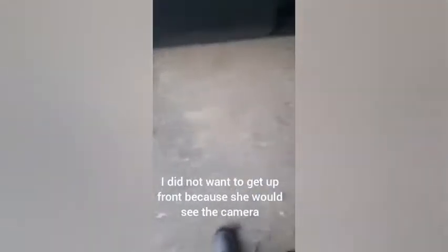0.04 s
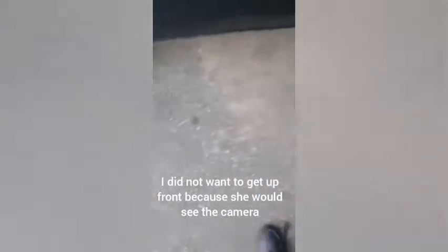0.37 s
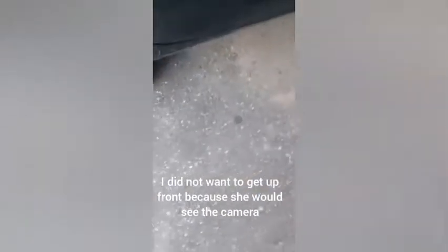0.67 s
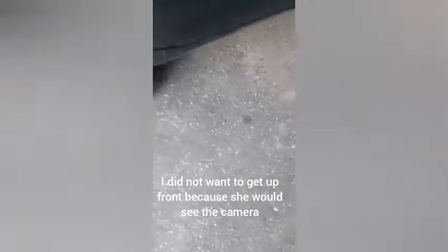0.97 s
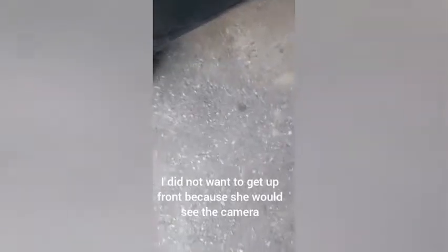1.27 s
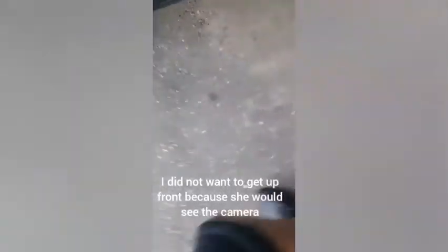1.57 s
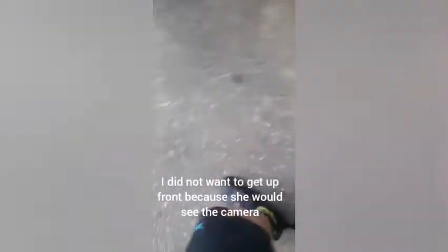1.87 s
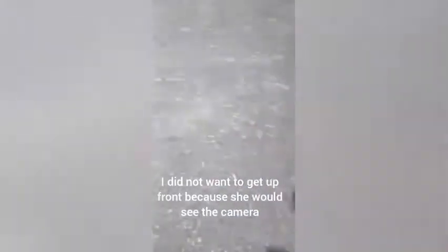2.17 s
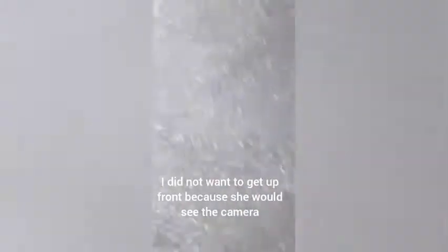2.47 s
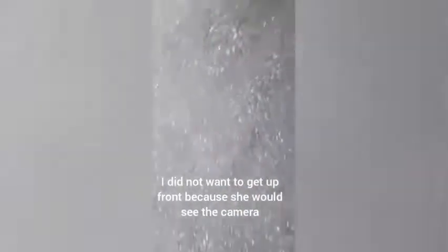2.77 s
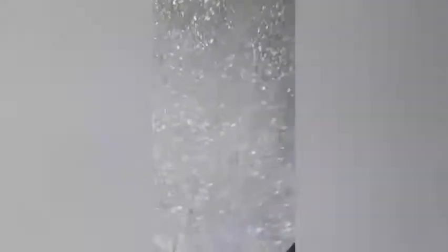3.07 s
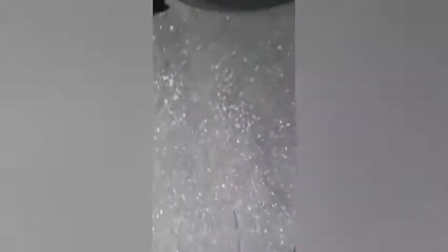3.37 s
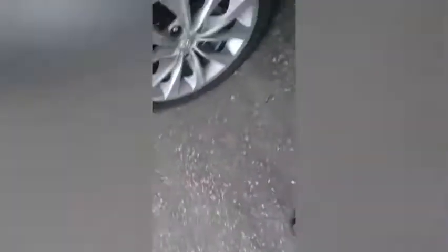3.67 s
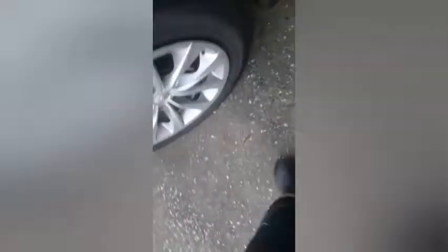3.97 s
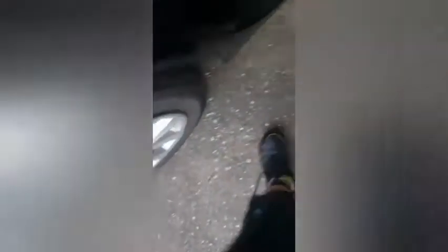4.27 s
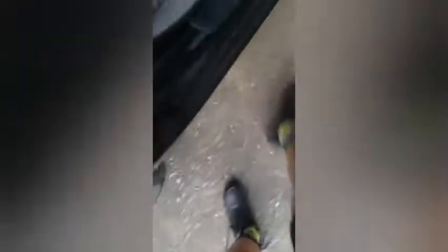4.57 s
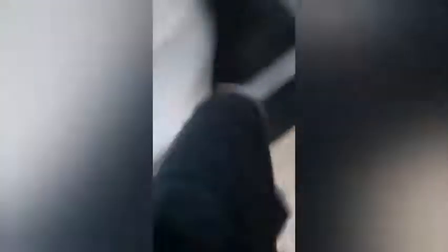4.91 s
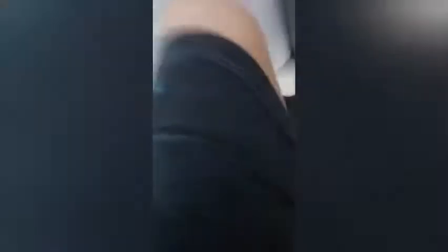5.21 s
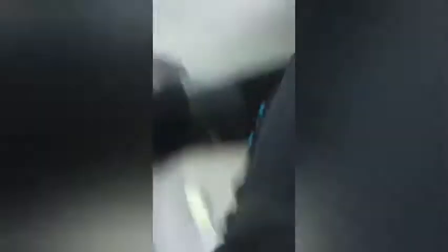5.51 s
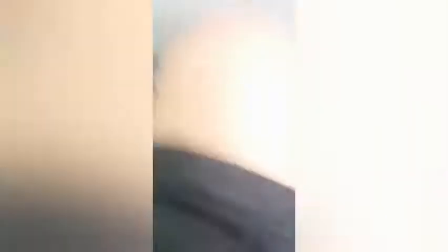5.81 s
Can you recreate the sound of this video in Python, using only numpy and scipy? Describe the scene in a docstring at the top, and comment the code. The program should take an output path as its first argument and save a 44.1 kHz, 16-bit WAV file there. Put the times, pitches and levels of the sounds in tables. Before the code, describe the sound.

A faint, low traffic rumble runs throughout this outdoor scene, heard from a handheld phone. From the start, close shoes scuff and crunch on gritty pavement while trousers rustle softly. A finger slides over the microphone on the right, rubbing and hissing briefly at 0.2 seconds and again from 1.5 to 2. At 2.2 and 2.8 seconds two car doors whoosh shut, with clicking latches, loud panel thuds and an echo from nearby walls. Scratchy finger rubs and snags return from 3 to 3.6 seconds, around a firm footfall at 3.2. A rubber sole gives a short, quiet squeak and scrape just after 4 seconds. Sharp handling ticks and rubs hit the microphone at about 4.3, 4.8 and 5.2 seconds. Clothes swish as the walker climbs in, and feet knock hard against the car's sill at 5.4 and 5.7 seconds, followed by a few softer bumps.

```python
"""Far traffic rumbles as someone holding a phone walks to a parked car, shoes scuffing and crunching
on gritty pavement. From the first steps on, a finger keeps sliding over the right microphone port,
rubbing and hissing. At 2.2 s and 2.8 s two other doors of the car whoosh shut: latches click, panels
thud and nearby walls echo. A rubber sole squeaks just after 4 s, and near the end feet knock hard
against the sill (the ledge under the door) as the walker climbs in."""
import sys
import numpy as np
from scipy import signal
from scipy.fft import rfft, irfft
from scipy.io import wavfile

SR = 44100
rng = np.random.default_rng(int(sys.argv[2]) if len(sys.argv) > 2 else 0)


def store_pcm(level_fs):
    """Save levels as 16-bit WAV."""
    pcm = np.round(np.clip(level_fs, -1, 1) * 32767).astype(np.int16)
    wavfile.write(sys.argv[1], SR, np.atleast_2d(pcm).T)


N = 266805
TIME = np.arange(N) / SR


def amp(db):
    """Turns decibels into a number to multiply a sound by."""
    return 10 ** (np.asarray(db) / 20)


def unit(x):
    """Scales a signal to an average (rms) size of 1."""
    return x / np.sqrt(np.mean(x ** 2) + 1e-20)


def at_pitch(points, hz):
    """Looks up a table at any pitch, blending between its rows."""
    pitches, values = np.transpose(points)
    return np.interp(np.log(hz + 1), np.log(pitches + 1), values)


def curves(rows):
    """Turns each column of a time table into a value for every sample."""
    times, *columns = np.transpose(rows)
    return [np.interp(TIME, times, column) for column in columns]


def add(mix, start_s, sound):
    """Mixes a sound in at the given time."""
    part = mix[..., round(start_s * SR):][..., :sound.shape[-1]]
    part += sound[..., :part.shape[-1]]


def through(x, response):
    """Passes each channel through a filter or an echo."""
    return signal.fftconvolve(np.atleast_2d(x), np.atleast_2d(response), axes=1)[:, :N]


def colour(x, tone, size=4096):
    """Makes some pitches stronger and others weaker, following a tone table."""
    log_gain = np.log(amp(at_pitch(tone, abs(np.fft.fftfreq(size, 1 / SR)))))
    spectrum = np.exp(np.conj(signal.hilbert(log_gain)))  # rings after a hit, never before
    taps = np.fft.ifft(spectrum).real[:size // 2]
    return through(x, taps / np.linalg.norm(taps))


def wander(hz):
    """A smooth random wobble, up to about hz times a second."""
    spectrum = rfft(rng.standard_normal(N))
    return unit(irfft(spectrum / (1 + (np.fft.rfftfreq(N, 1 / SR) / hz) ** 4), N))


def dying(fade_s):
    """Half a second of a fade that drops 60 dB every fade_s."""
    return 1000 ** (-TIME[:SR // 2] / max(fade_s, 1e-4))


# How alike left and right sound, from 0 to 1: pitch_hz, likeness
LIKENESS = [(50, 0.88), (300, 0.92), (600, 0.59), (1200, 0), (2500, 0.016), (5000, 0.096), (16000, 0.18)]
def two_ports(pair):
    """The phone's two microphone holes (ports) are close, so they share bass but not treble."""
    size = pair.shape[1]
    a, b = rfft(pair)
    alike = np.clip(at_pitch(LIKENESS, np.fft.rfftfreq(size, 1 / SR)), 0, 1)
    mid, side = a * np.sqrt((1 + alike) / 2), b * np.sqrt((1 - alike) / 2)
    return irfft(np.array([mid + side, mid - side]), size)


# Tone of far traffic: pitch_hz, gain_db
TRAFFIC_TONE = [(12, -43), (20, -23), (65, 0), (123, -0.5), (172, -5), (198, -12.5), (234, -5.5),
                (277, -14.5), (319, -13.5), (459, -13), (738, -15.5), (1710, -31), (4060, -66.5),
                (6180, -51), (16000, -43.5)]
# Its loudness as the car screens it off: time_s, level_db
TRAFFIC_LEVEL = [(0, -58.5), (2, -59), (3.6, -62), (4.5, -63.5), (5, -63.5), (6.05, -55.5)]
def traffic(hum_hz=120.8, hum_db=-72):
    """Far traffic makes a low rumble with a wavering hum in it."""
    rumble = unit(colour(two_ports(rng.standard_normal((2, N))), TRAFFIC_TONE))
    hum = np.sin(2 * np.pi * np.cumsum(hum_hz + 12 * wander(26.7)) / SR)
    hum *= amp(hum_db + 1.3 * wander(5.7))
    return rumble * amp(curves(TRAFFIC_LEVEL)[0] + 2.1 * wander(5.9)) + hum


def friction(per_s, spread_db, smooth, clump_db):
    """Rubbing makes tiny slips of uneven size, coming in clumps over a smooth hiss."""
    sizes = amp(spread_db * np.minimum(rng.exponential(1, N), 4)) * rng.choice([-1, 1], N)
    slips = unit(sizes * (rng.random(N) < per_s / SR))
    return unit((slips + smooth * rng.standard_normal(N)) * amp(clump_db * wander(66.3)))


def slide(peak_s, rise_s, hold_s, fall_s, range_db=33.5):
    """Loudness of one slide: it climbs range_db in rise_s, holds, and sinks as far in fall_s."""
    before = np.maximum(peak_s - TIME, 0) / max(rise_s, 1e-3)
    after = np.maximum(TIME - peak_s - hold_s, 0) / max(fall_s, 1e-3)
    return amp(-range_db * np.minimum(before + after, 10))


# Trousers rustling with the pace of the walk: time_s, level_db
RUSTLE_LEVEL = [(0, -75.5), (.9, -85), (1.4, -73.5), (2.3, -74), (3.4, -80), (4.5, -83), (5.3, -69),
                (6.05, -82)]
# Shoes dragging, clothes swishing, and a whoosh just before each door shuts:
# peak_s, rise_s, hold_s, fall_s, scrape_db, swish_db
SCUFFS_AND_WHOOSHES = [(.005, 0.048, 0.0037, 0.067, -56.5, -69), (0.225, 0.12, 0.009, 0.16, -54, -69),
                       (0.36, .1, 0.068, 0.092, -68.5, -79), (0.487, .05, .04, .08, -83, -72),
                       (0.606, .035, 0.017, 0.12, -53, -66), (2.182, 0.035, .01, .03, -52.5, -66),
                       (2.54, .035, 0.039, 0.19, -50, -62.5), (2.776, 0.023, 0.069, .08, -52.5, -56),
                       (2.955, 0.048, .01, 0.26, -54, -60.5), (3.057, .1, 0.058, 0.11, -59, -72),
                       (3.172, 0.022, .03, 0.17, -55, -64.5), (3.764, 0.058, 0.1, 0.26, -61.5, -65.5),
                       (4.058, 0.033, 0.019, 0.037, -71, -88.5), (4.098, .025, 0.021, 0.049, -53, -59),
                       (4.138, 0.055, 0.032, 0.086, -45.5, -59), (4.36, 0.17, .01, 0.12, -72, -71),
                       (4.628, 0.12, 0.016, 0.32, -53.5, -63), (4.917, 0.021, .005, 0.033, -103, -59),
                       (4.944, 0.014, 0.028, 0.035, -57.5, -62.5), (5.008, .015, .003, .04, -80, -70),
                       (5.043, 0.021, 0.041, .13, -59.5, -50), (5.411, 0.082, 0.038, 0.056, -40.5, -47),
                       (5.507, 0.043, 0.0073, 0.05, -59, -59.5), (5.588, 0.1, 0.017, .2, -67, -65),
                       (5.724, 0.094, .19, 0.33, -56.5, -64.5)]
# Tone of the scraping: pitch_hz, gain_db
SCRAPE_TONE = [(60, -11.5), (200, 1.5), (450, 3), (900, 0.5), (1800, -1.5), (3000, -6.5), (5000, -22),
               (16000, -60)]
# Tone of the swishing: pitch_hz, gain_db
SWISH_TONE = [(1000, -39), (2500, -4.5), (3500, 1.5), (6000, -2), (8500, -2.5), (10500, -12.5), (16000, -9)]
def scuffs_and_whooshes():
    """Grit rolls under the soles and cloth rubs; the same noises make each swinging door's whoosh."""
    swish = amp(curves(RUSTLE_LEVEL)[0])
    scrape = swish * amp(4)  # soles keep shifting on grit between drags
    for *timing, scrape_db, swish_db in SCUFFS_AND_WHOOSHES:
        swell = slide(*timing)
        scrape = np.hypot(scrape, amp(scrape_db) * swell)
        swish = np.hypot(swish, amp(swish_db) * swell)
    grit = np.array([friction(1500, spread_db=5.2, smooth=1, clump_db=1.45) for _ in range(2)])
    cloth = np.array([friction(3000, spread_db=1.5, smooth=1.8, clump_db=2.5) for _ in range(2)])
    scraping = colour(two_ports(grit) * scrape * amp(-1), SCRAPE_TONE)
    return scraping + colour(cloth * swish * amp(-2.5), SWISH_TONE)


def ring(notes, pitch=1):
    """A struck object rings with several fading notes; raising the pitch also shortens them."""
    sound = np.zeros(SR // 2)
    for k, (hz, db, fade_s) in enumerate(notes):
        wave = (-1) ** k * np.sin(2 * np.pi * hz * pitch * TIME[:SR // 2])  # every other one flipped
        sound += amp(db) * dying(fade_s / pitch) * wave
    return sound


def blows(hits, notes, burst_tone, grain_db, contact_s):
    """Each blow rings an object and sets off a fading burst of tiny clicks."""
    body, burst_power = np.zeros(N), np.zeros(N)
    press = 1 - np.exp(-TIME[:SR // 2] / contact_s)  # rubber gives before it grips
    for start_s, body_db, burst_db, fade_s, pitch in hits:
        tone = ring(notes, pitch) * press
        add(body, start_s, amp(body_db) * tone / abs(tone).max())
        add(burst_power, start_s, (amp(burst_db) * dying(fade_s) * press) ** 2)
    clicks = np.array([friction(2500, grain_db, smooth=0.99, clump_db=0.15) for _ in range(2)])
    return body + colour(two_ports(clicks * np.sqrt(burst_power)), burst_tone)


# Footfalls and knocks on the car: start_s, knock_db, crunch_db, crunch_fade_s, pitch_factor
STEPS = [(.184, -49.5, -64, .026, 0.81), (.616, -68, -42, .09, 1.2), (1.326, -62, -64, .012, 3),
         (1.369, -52.5, -52, 0.011, 2.7), (1.765, -51, -46, 0.021, 1.46), (2.513, -53, -44.5, 0.014, 2.7),
         (3.187, -33, -35.5, 0.065, 1.18), (3.228, -40.5, -61, 0.16, 1.13), (3.307, -51, -47, 0.027, 0.91),
         (4.097, -54, -49, .038, 0.8), (4.939, -62, -44, .05, 2), (5.041, -53, -47, 0.013, 2.1),
         (5.407, -27, -35.5, 0.069, 1.04), (5.416, -30, -45, .05, .596), (5.638, -33, -35, 0.085, 1.48),
         (5.667, -23, -27, 0.02, 1.087), (5.743, -40, -53.5, 0.17, 0.73), (5.814, -44, -41.5, 0.022, 1.36),
         (5.92, -45, -60, .08, 0.71)]
# Notes that shoe and sill ring with: pitch_hz, level_db, fade_s
SHOE_AND_SILL_NOTES = [(169, -8.5, 0.19), (273, 5.5, 0.049), (332, -9, 0.058), (496, -6, 0.048),
                       (630, -4.5, 0.043), (926, 0.5, 0.031), (1303, 0, 0.0087), (1510, -15, 0.006),
                       (1830, 2, 0.0074), (2870, -10.5, 0.0028), (3960, -13, 0.016)]
# Tone of grit crushed under a sole: pitch_hz, gain_db
CRUNCH_TONE = [(80, -3.5), (300, -4.5), (800, 3), (1800, -4.5), (3500, -11.5), (5500, -21.5), (8500, -27),
               (10500, -31.5), (16000, -32)]
def steps():
    """The heel lands, then the sole settles just after it, softer and lower."""
    soles = [(start_s + 0.011, knock_db - 8, crunch_db - 12, fade_s, pitch * 0.792)
             for start_s, knock_db, crunch_db, fade_s, pitch in STEPS]
    return blows(list(STEPS) + soles, SHOE_AND_SILL_NOTES, CRUNCH_TONE, grain_db=2.5, contact_s=0.0002)


# The gap under the finger shuts out sound below its own pitch: multiple_of_gap_pitch, gain_db
GAP_TONE = [(.3, -32), (.7, -17), (.87, -9), (1, 4), (1.2, 1), (1.5, 1), (2, -2), (3.5, -2.5), (5, -4),
            (7.5, -19)]
# Tone of the microphone port itself: pitch_hz, gain_db
PORT_TONE = [(1000, 8.5), (4000, 0), (6500, -1.5), (8500, -0.5), (10300, -9.5), (13000, -3), (16000, -14)]
def through_gap(hiss, rub, gap_hz, treble_db, seal, size=512):
    """Hiss passes the changing gap under the finger, whistles faintly and joins the rub in the case."""
    hz, times, (port, case) = signal.stft(np.array([hiss, rub]), SR, nperseg=size)
    multiple = hz[:, None] / np.interp(times, TIME, gap_hz)
    octaves = np.log2(multiple + 1e-6)
    whistle_db = 2.5 * np.exp(-(octaves / 0.024) ** 2)
    bright_db = np.interp(hz, [8000, 11000], [0, 1])[:, None] * np.interp(times, TIME, treble_db)
    gain = amp(at_pitch(GAP_TONE, multiple) + whistle_db + bright_db + at_pitch(PORT_TONE, hz)[:, None])
    gain /= np.sqrt(np.mean(gain ** 2, axis=0))
    # As the finger seals the port, case and gap cancel just below the gap's pitch.
    dip_shape = np.exp(-((octaves - np.log2(0.85)) / 0.19) ** 2)
    dip = amp(-12 * np.interp(times, TIME, seal) * dip_shape)
    return signal.istft(port * gain + case * dip, SR, nperseg=size)[1][:N]


# A finger sliding over the port:
# peak_s, rise_s, hold_s, fall_s, rub_db, hiss_db, treble_db, gap_pitch_hz, glide_octaves_per_s
FINGER_STROKES = [(0.248, 0.065, .008, 0.082, -48.5, -58, -1, 4260, 3),
                  (.79, .1, 0.11, 0.35, -69, -83, -10, 4200, 4),
                  (1.48, 0.12, 0.018, 0.12, -55, -55, -2, 4140, 1),
                  (1.594, 0.22, 0.02, 0.067, -60.5, -57, -0.5, 4100, 1.5),
                  (1.809, 0.12, .01, 0.13, -49, -52, -3, 4100, -4),
                  (1.955, .08, 0.022, 0.25, -50, -55.5, -2.5, 3900, 3.5),
                  (2.102, .05, 0.0069, 0.19, -72, -63, 0, 4040, 5),
                  (2.95, .04, 0.016, .15, -60, -66, 8, 3600, -8.5),
                  (3.035, 0.057, 0.039, 0.085, -46, -40, 3, 3650, 5),
                  (3.06, 0.032, 0.0084, 0.024, -41, -31, -1, 3300, -3),
                  (3.266, 0.032, .04, 0.12, -54, -60.5, -6, 3200, 10),
                  (3.352, .12, .022, 0.032, -46.5, -52.5, -23, 2970, 11),
                  (3.457, 0.015, 0.0079, .06, -58, -57, -11, 1310, 3),
                  (3.493, 0.047, 0.042, .07, -44.5, -44.5, -34, 1400, 9.5),
                  (3.574, 0.068, 0.049, 0.062, -53, -55.5, -19, 2180, 6),
                  (4.253, .05, 0.055, 0.11, -49.5, -54, 2, 3960, 0.5),
                  (4.706, 0.062, 0.026, .08, -50.5, -46.5, 3, 2920, 18),
                  (4.751, 0.065, 0.033, 0.057, -47.5, -42, 3.5, 3560, 3),
                  (5.181, 0.042, 0.027, 0.082, -40.5, -41.5, -7, 2540, 15),
                  (5.252, 0.17, 0.15, 0.069, -41, -46.5, -2.5, 4670, 2.2)]
# Skin catching and letting go: start_s, case_knock_db, port_tick_db, fade_s
SKIN_SNAGS = [(1.804, -38.5, -46, 0.021), (3.062, -28.5, -30.5, 0.012), (3.364, -39, -39.5, 0.0074),
              (3.459, -48, -51, 0.014), (3.488, -35.5, -39, 0.014), (3.518, -39, -35, 0.0071),
              (3.532, -38, -43, .014), (3.589, -56, -34.5, 0.0053), (4.336, -33, -24.5, 0.0041),
              (4.341, -25.5, -25.5, 0.0061), (4.357, -46, -43, 0.0064), (4.75, -43, -30.5, 0.023),
              (4.766, -24.5, -24.5, 0.0063), (5.179, -28.5, -35, 0.02), (5.488, -45, -53, 0.0064)]
# Tone of a touch heard through the phone's case: pitch_hz, gain_db
CASE_TONE = [(40, -15), (120, 6), (400, 1.5), (900, -0.5), (1800, -5), (2800, -7.5), (4200, -12),
             (7000, -21.5), (16000, -38)]
def finger(case_slowness=1.35, sealed_db=-35.5):
    """Skin slips and snags over the right port, heard through the case and through the gap."""
    rub, hiss, treble_db, gap_hz = np.zeros(N), np.zeros(N), np.zeros(N), np.ones(N)
    for peak_s, rise, hold, fall, rub_db, hiss_db, bright_db, hz, glide in FINGER_STROKES:
        press = amp(hiss_db) * slide(peak_s, rise, hold, fall)
        gliding_hz = hz * 2 ** (glide * np.clip(TIME - peak_s, -rise, hold + fall))
        firmest = press > hiss  # the firmest stroke sets the gap
        gap_hz = np.where(firmest, gliding_hz, gap_hz)
        treble_db = np.where(firmest, bright_db, treble_db)
        hiss = np.hypot(hiss, press)
        slow_swell = slide(peak_s, rise * case_slowness, hold, fall * case_slowness)
        rub = np.hypot(rub, amp(rub_db) * slow_swell)
    slips = friction(3500, spread_db=2.35, smooth=0.82, clump_db=0.97)
    knocks, ticks = np.zeros(N), np.zeros(N)
    for start_s, knock_db, tick_db, fade_s in SKIN_SNAGS:
        burst = dying(fade_s) * rng.standard_normal(SR // 2)
        add(knocks, start_s, amp(knock_db) * burst)
        add(ticks, start_s, amp(tick_db) * burst)
    seal = np.minimum(rub / amp(sealed_db), 1) ** 2
    case_rub = colour(slips * rub * amp(-3), CASE_TONE)[0]
    rubbing = through_gap(slips * hiss + ticks, case_rub, gap_hz, treble_db, seal)
    return (rubbing + colour(knocks, CASE_TONE)) * amp([[-29], [0]])  # the left gets only a trace


# Single notes ringing from slammed doors, latches, soles and bumps on the phone:
# start_s, pitch_hz, level_db, fade_s
SHORT_RINGS = [(0.762, 153, -44.5, 0.03), (1.743, 377, -43.5, 0.056), (2.198, 503, -21, 0.073),
               (2.217, 411, -15, 0.04), (2.218, 616, -22, 0.068), (2.222, 329, -20.5, 0.049),
               (2.827, 121, -27.5, 0.088), (2.539, 345, -36, 0.033), (2.872, 545, -22.5, 0.039),
               (3.186, 440, -25, 0.026), (3.199, 1320, -49, 0.16), (3.531, 122, -41, 0.11),
               (4.018, 76.4, -50, 0.62), (4.094, 613, -40, 0.053), (4.655, 138, -42, 0.11),
               (5.997, 74, -51, 0.52)]
def short_rings():
    """A struck door, latch, sole or phone rings with notes that quickly fade."""
    sound = np.zeros(N)
    for start_s, *note in SHORT_RINGS:
        add(sound, start_s, ring([note]))
    return sound


# Latches touching and catching: start_s, thud_db, clatter_db, clatter_fade_s, pitch_factor
LATCHES = [(2.188, -67, -42.5, 0.15, 11), (2.198, -49, -29, 0.29, 2.7), (2.784, -57, -40.5, .065, 2.4),
           (2.795, -49, -33.5, 0.24, 3.5), (2.835, -36, -24.5, 0.037, 1.06), (2.862, -34, -30, 0.026, 1.1),
           (2.942, -55, -35, 0.043, 1.3)]
# Doors meeting their frames:
# start_s, thud_db, clatter_db, first_shudder_after_s, clatter_fade_s, pitch_factor_per_shudder
DOOR_SLAMS = [(2.216, -19, -25, .0287, 0.17, .887), (2.825, -23.5, -31, .0084, 0.11, .939)]
# Notes that a door panel rings with: pitch_hz, level_db, fade_s
PANEL_NOTES = [(55.6, -4, 0.25), (80, -6, 0.095), (127.5, 5.5, 0.088), (155, -4.5, 0.22),
               (251.6, -3.5, 0.11), (276, -11.5, 0.23), (351, -1.5, 0.047), (481, -1, 0.046),
               (500, -16, 0.49), (620, -16.5, 0.057), (813, -27.5, 0.46), (966, -33, 0.19),
               (1264, -25, 0.244), (2270, -15, 0.1)]
# Tone of the latch and trim clattering: pitch_hz, gain_db
CLATTER_TONE = [(60, -9.5), (200, 4), (500, 0), (900, -3.5), (1500, -11.5), (2500, -14.5), (4000, -23),
                (8000, -32.5), (10500, -43), (16000, -46)]
def doors():
    """Each door latches, hits its frame and shudders against it, ever faster, weaker and lower."""
    hits = list(LATCHES)
    for start_s, thud_db, clatter_db, wait_s, fade_s, sag in DOOR_SLAMS:
        for k in range(4):
            pitch = 1.16 * sag ** k  # the panel is tightest at the first blow
            hits.append((start_s, thud_db - 1.5 * k, clatter_db - 5.5 * k, fade_s, pitch))
            start_s += wait_s * 0.91 ** k
    return amp([[0.2], [-0.2]]) * blows(hits, PANEL_NOTES, CLATTER_TONE, grain_db=-1, contact_s=0.000067)


# The squeak of one shoe: time_s, pitch_hz, level_db
SOLE_SQUEAK = [(4.11, 399, -56), (4.135, 407, -56), (4.16, 444, -59), (4.185, 458, -53.5),
               (4.215, 437, -70)]
def squeak():
    """A rubber sole twists and gives one short, unsteady note."""
    hz, level_db = curves(SOLE_SQUEAK)
    sounding = (TIME > SOLE_SQUEAK[0][0]) & (TIME < SOLE_SQUEAK[-1][0])
    phase = 2 * np.pi * np.cumsum(hz * (1 + 0.027 * wander(80))) / SR
    return np.sqrt(2) * np.sin(phase) * amp(level_db) * sounding


# How long the echo from nearby walls lasts: pitch_hz, fade_s
WALL_FADES = [(60, 0.37), (250, 1.97), (600, 0.97), (2000, 1.4), (5000, 1.4), (12000, 0.98)]
def echo(x, early_db, early_fade_s, late_db, size=256):
    """Sound bounces quickly off ground and car, then comes back from the walls in a long tail."""
    t = TIME[:SR + SR // 2]
    hz, times, noise = signal.stft(two_ports(rng.standard_normal((2, len(t)))), SR, nperseg=size)
    fade = 1000 ** (-times / at_pitch(WALL_FADES, hz)[:, None])
    late = signal.istft(noise * fade, SR, nperseg=size)[1][:, :len(t)]
    late *= 1 - np.exp(-t / 0.01)
    early = two_ports(rng.standard_normal((2, SR // 2))) * dying(early_fade_s) * (t[:SR // 2] > 0.004)
    early *= amp(early_db) / np.linalg.norm(early[0])
    late *= amp(late_db) / np.linalg.norm(late[0])
    return through(x, early) + through(x, late)


def scene():
    """The doors fill the space, the feet are close, and the finger is right at the microphone."""
    slams = doors() + short_rings()
    close = amp([[0.5], [-0.5]]) * (steps() + scuffs_and_whooshes() + squeak())  # slightly to the left
    slams = slams + echo(slams, early_db=-8.5, early_fade_s=0.41, late_db=-18)
    close = close + echo(close, early_db=-9, early_fade_s=0.047, late_db=-18)
    return slams + close + finger() + traffic()


def record(dry):
    """The phone cuts off the highest treble."""
    top_hz = 15900
    low_pass = signal.firwin(511, top_hz, window=("kaiser", 9), fs=SR)
    return signal.oaconvolve(dry, low_pass[None], "same")


dry = scene()
out = record(dry)
store_pcm(out)
```